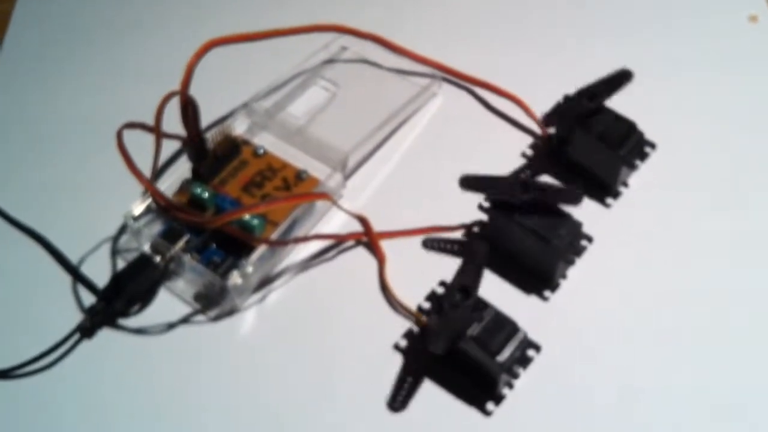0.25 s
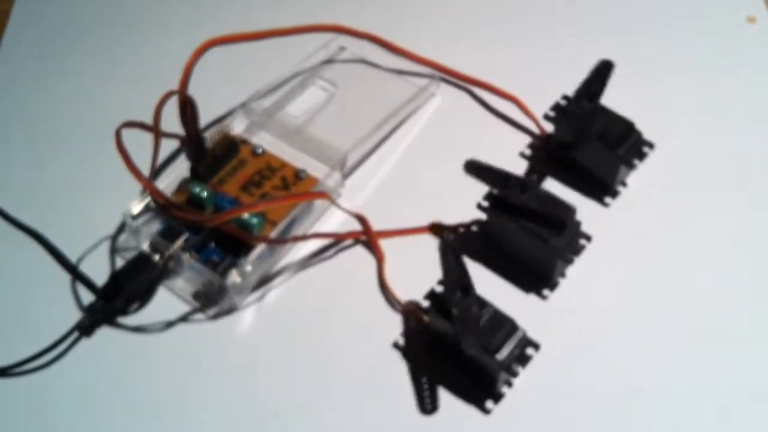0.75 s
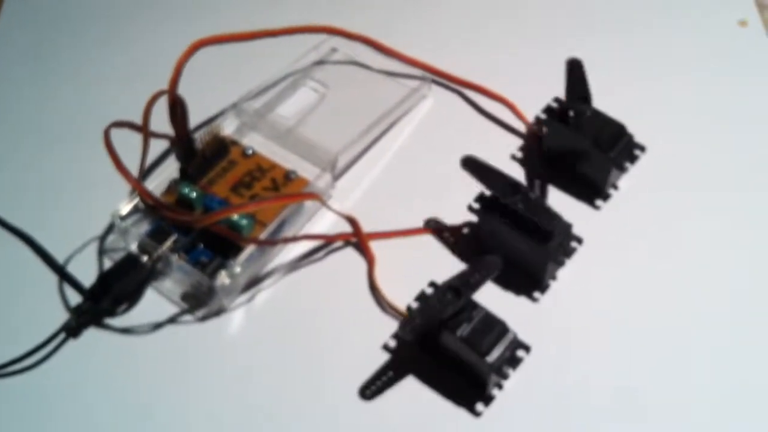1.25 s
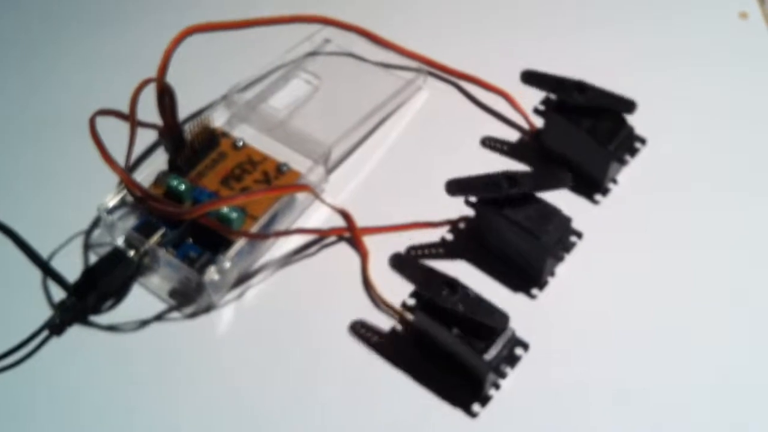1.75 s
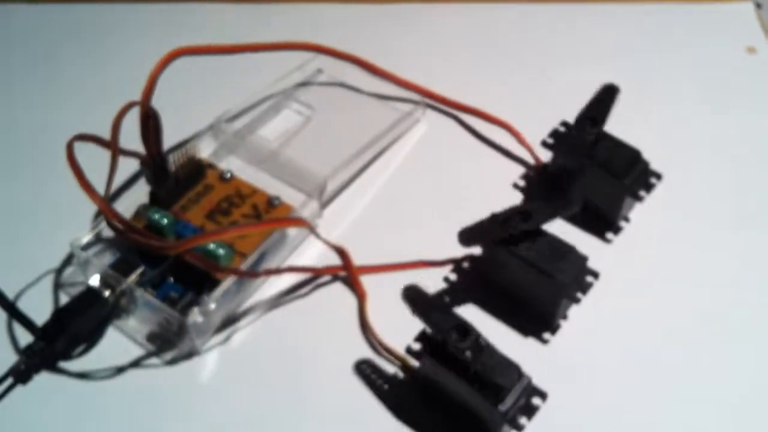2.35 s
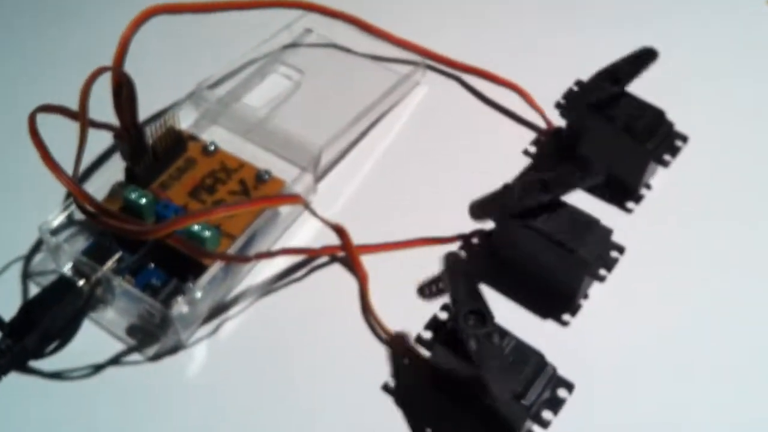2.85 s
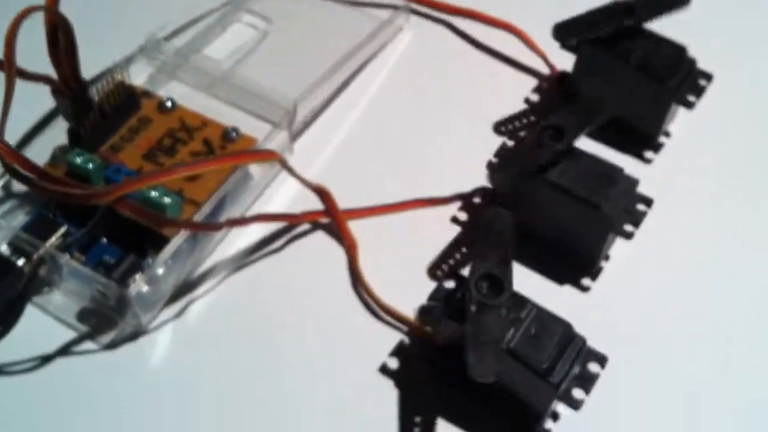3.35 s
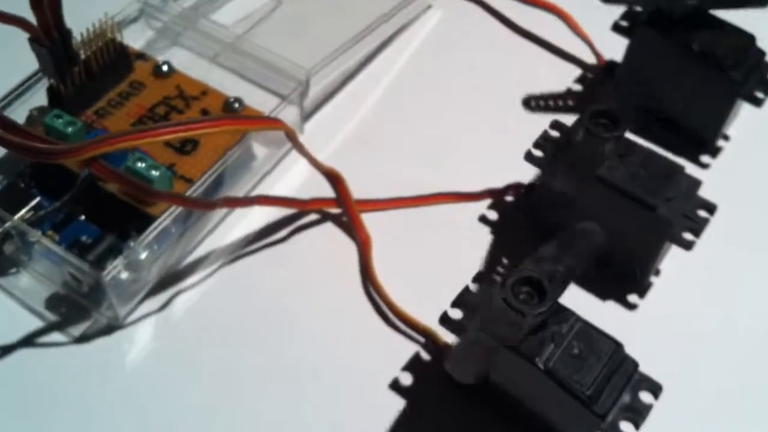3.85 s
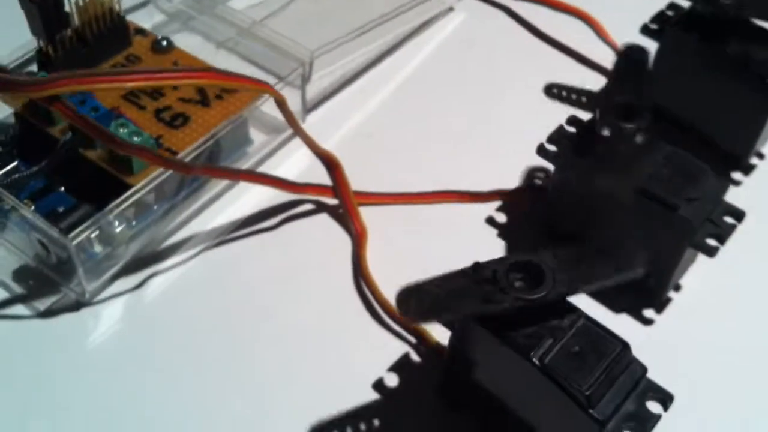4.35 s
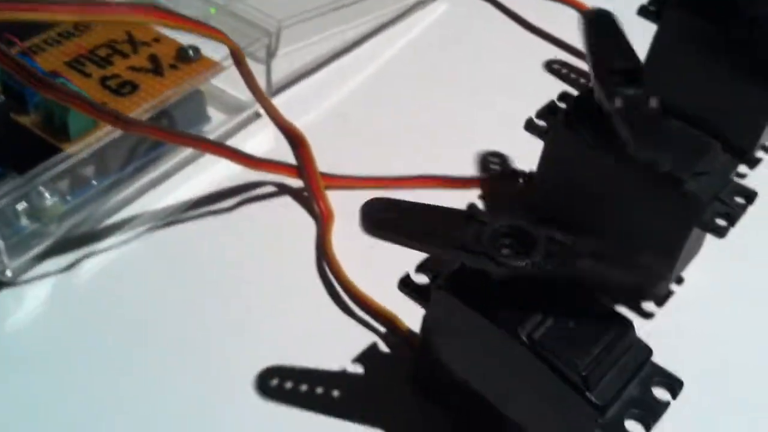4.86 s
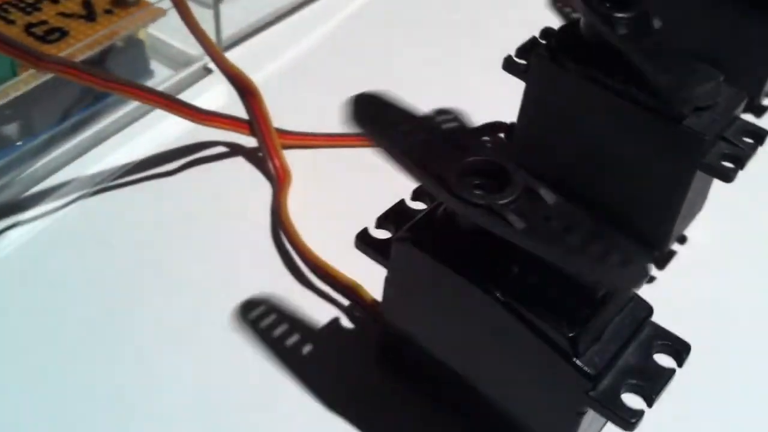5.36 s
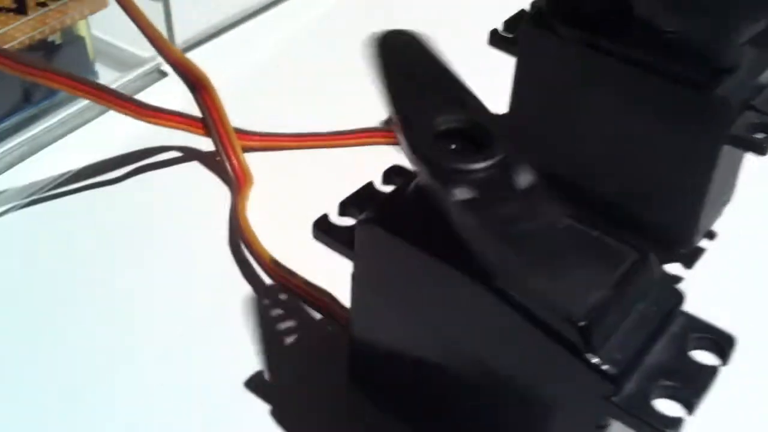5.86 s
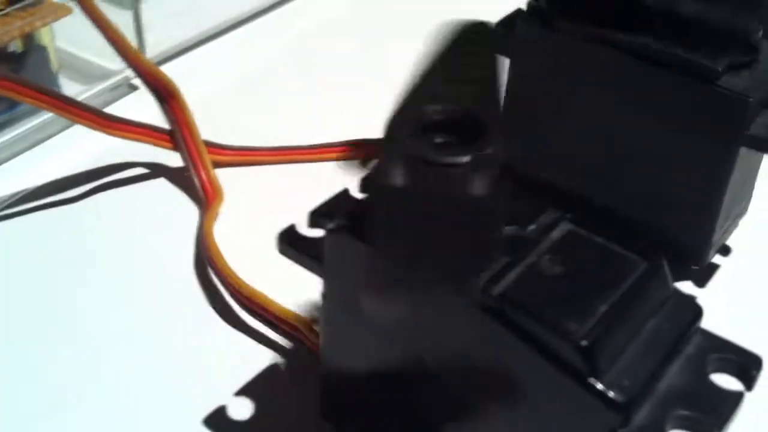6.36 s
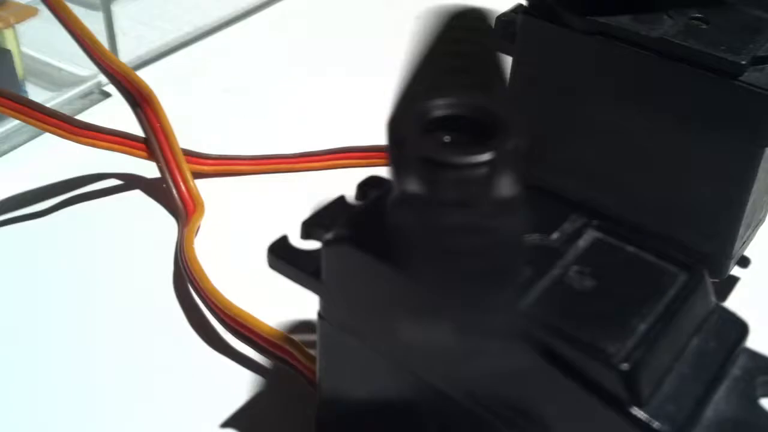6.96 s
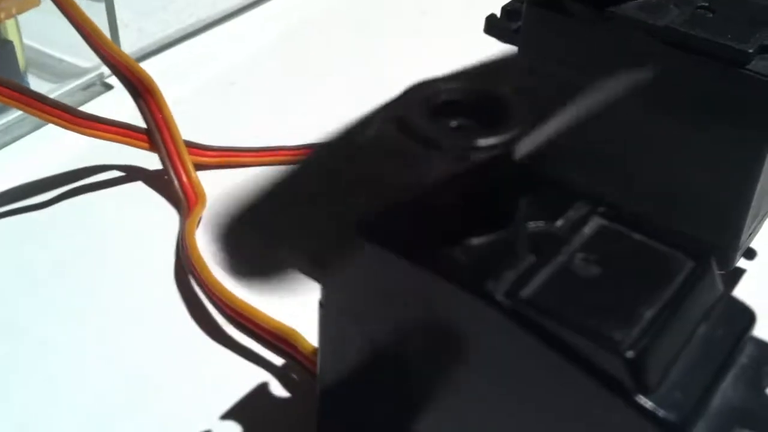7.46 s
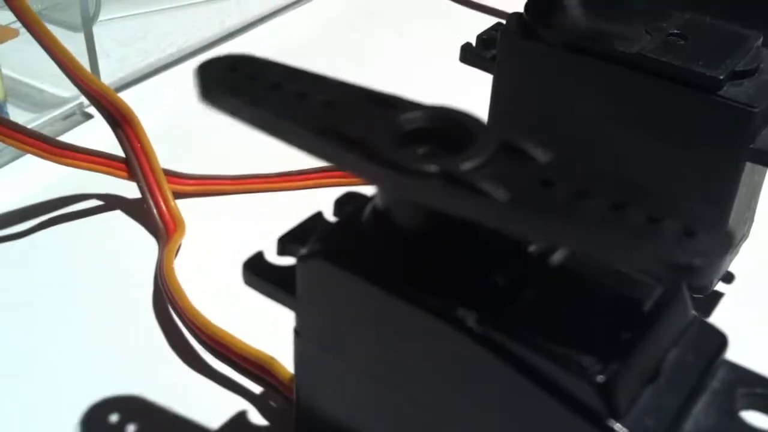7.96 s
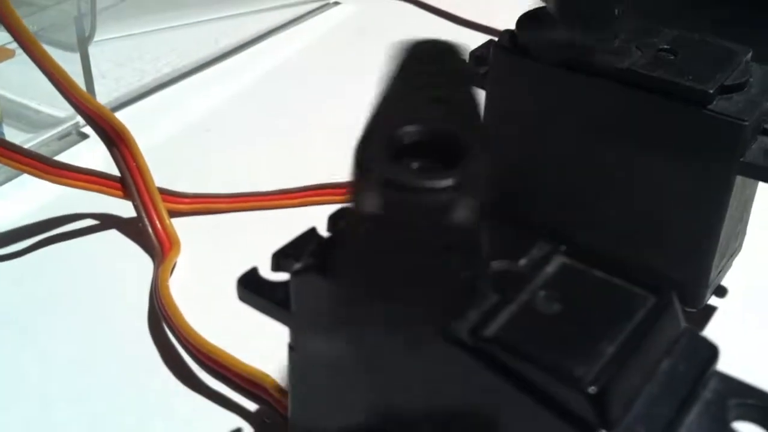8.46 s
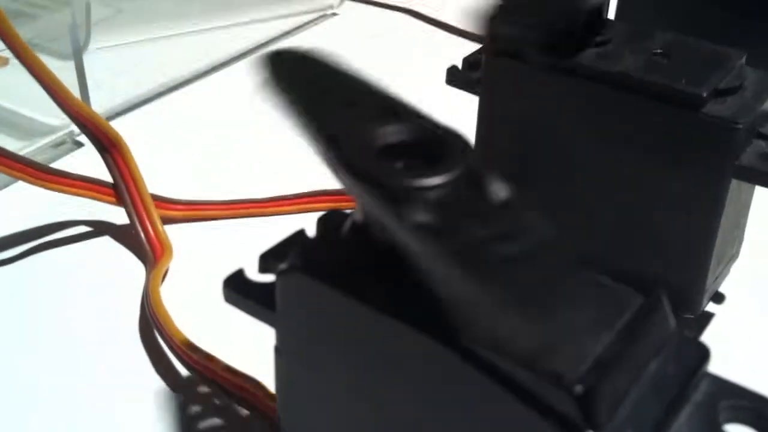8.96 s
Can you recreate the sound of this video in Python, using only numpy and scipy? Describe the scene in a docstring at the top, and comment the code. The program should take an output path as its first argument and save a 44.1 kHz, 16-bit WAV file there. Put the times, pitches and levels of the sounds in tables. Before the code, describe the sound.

Three small servo motors run continuously on a table in a quiet room. A high gear whine wavers over rasping teeth, a fizzy rattle in plastic cases and scattered sharp clicks. The whine sinks in pitch early on, then climbs back. Everything grows louder as the microphone moves in on the nearest servo, which slows unevenly once more and speeds up again near the end. A faint motor hum lies underneath.

```python
"""Three small servo motors on a table

Three hobby servos sweep their arms to and fro while the listener moves in on the nearest one.
Its pinion (the small gear on the motor) whines against a slightly off-centre gear, rising and falling
with the speed. Teeth rasp and rattle in the plastic cases, the motor brushes fizz, and loose gears click.
Behind that are the hum of the other two motors, a faint drone, two soft bumps and a quiet room.
A faint, very high hiss comes and goes."""
import sys
import numpy as np
from scipy import signal
from scipy.fft import rfft, irfft, next_fast_len
from scipy.io import wavfile
from scipy.ndimage import uniform_filter1d, map_coordinates

SR = 44100
rng = np.random.default_rng(int(sys.argv[2]) if len(sys.argv) > 2 else 0)


def wav_record(signal):
    """Record a signal, one row per channel, as 16-bit PCM in the file named by sys.argv[1]."""
    frames = np.transpose(np.atleast_2d(signal))
    bounded = np.clip(frames, -1, 1)
    # unit amplitude maps onto the largest positive 16-bit level
    quanta = np.round(bounded * 32767).astype(np.int16)
    wavfile.write(sys.argv[1], SR, quanta)


N = 406161

# Tone colour of the room's rumble: frequency_hz, gain_db
ROOM_COLOUR = [(15, -32), (45, -15), (65, -20), (95, -13), (130, -2), (240, 1), (320, -0.5), (450, -5.5),
               (1000, -10.5), (4000, -19.5)]
# A faint low hum that comes and goes: start_s, end_s, first_pitch_hz, last_pitch_hz, level_db
DRONE_NOTES = [(-.1, .9, 246, 248.4, -64), (0.803, 2.196, 264, 263.3, -68), (5.5, 6.702, 200.1, 199, -61.5),
               (6.8, 7.848, 184, 177.2, -65.5)]
# Tone colour of the dull thud: frequency_hz, gain_db
THUD_COLOUR = [(40, -28), (120, 9), (300, -9), (800, -14), (2000, -50)]
# Tone colour of a faint, very high hiss: frequency_hz, gain_db
TOP_HISS_COLOUR = [(9000, -70), (13000, -22), (14200, 1), (15000, -16), (16000, 6)]
# How that hiss comes and goes, compared with the level of the fizz: time_s, gain_db
TOP_HISS_GAIN = [(0, -5), (2, -15), (4.3, -9), (4.7, 7), (5.6, 9), (6.1, -4), (7.8, -38), (8.2, 9)]

# Speed of the second motor: time_s, turns_per_s
SECOND_SPEED = [(0, 235), (1.05, 231), (1.3, 238), (1.55, 214), (2.3, 196), (2.43, 222), (2.56, 242),
                (2.8, 247), (6.92, 245), (7.12, 226), (7.3, 178), (7.48, 190), (7.64, 217), (7.76, 180),
                (7.98, 162), (8.4, 171), (8.6, 200), (8.88, 234), (9.21, 236)]
# Speed of the third motor: time_s, turns_per_s
THIRD_SPEED = [(0, 240), (1.3, 228), (2.07, 200), (2.5, 230), (3.0, 223), (4.2, 236), (6.8, 236),
               (7.13, 224), (7.32, 238), (7.66, 213), (7.85, 167), (8.1, 240), (8.44, 221), (8.8, 237),
               (9.21, 234)]
# How strongly those two motors hum under their load: time_s, gain_db
HUM_GAIN = [(0, 0), (.5, -1.5), (1.4, -1), (2.48, 2.5), (3.1, -1), (4.5, 2.5), (6.8, -1.5), (7.5, -4),
            (8.3, 2.5), (8.8, 2), (9.21, 1)]
# Speed of the nearest servo: time_s, teeth_per_s
NEAR_SPEED = [(0, 2273), (.8, 2220), (1.0, 2109), (1.3, 2170), (1.6, 1520), (1.77, 1380), (2.15, 999),
              (2.68, 2004), (3.0, 2185), (4.2, 2240), (6.15, 2229), (6.55, 2156), (6.8, 2073), (6.97, 1882),
              (7.08, 1607), (7.25, 1300), (7.52, 1315), (7.6, 1860), (7.65, 1473), (7.76, 1200),
              (7.88, 1355), (8.05, 1945), (8.14, 2116), (8.42, 2027), (8.85, 2245), (9.21, 2250)]
# Loudness of the gears, from their load and closeness: time_s, gain_db
GEAR_GAIN = [(0, -7), (1.0, -7), (1.38, -8.5), (1.52, -8.5), (2.13, -10), (2.5, -3.5), (3.1, -4),
             (3.6, -1.5), (4.4, 0), (5.1, 2.5), (5.6, 1), (6.05, 4), (6.33, 6), (6.57, 5.5), (6.7, 1),
             (7.1, 3), (8.2, 3), (8.65, 5), (9.21, 5.5)]

# Tone colour of the grinding heard through the cases: frequency_hz, gain_db
GRIND_COLOUR = [(60, -68), (300, -18), (600, -28.5), (1000, -11), (1230, -9), (1420, -8), (1700, -3.5),
                (2000, -0.5), (2600, 6), (3150, 3), (3600, 1), (4600, -3), (6000, -13.5)]
# Tone colour of the rasping teeth: frequency_hz, gain_db
RASP_COLOUR = [(200, -80), (2000, -54), (3500, -5), (4500, -7), (4900, -1.5), (5500, 3.5), (6100, 5),
               (6700, 1.5), (7200, -4), (7700, -2.5), (8300, -11), (9500, -3.5), (14000, -41)]
# Tone colour of the brush fizz: frequency_hz, gain_db
FIZZ_COLOUR = [(300, -95), (4000, -31), (7000, -11.5), (8400, -9.5), (9100, -4.5), (9900, -3.5), (10900, 2),
               (11600, 3.5), (12300, 3.5), (13300, 1), (14000, -6), (14700, -31), (16000, -40)]
# Loudness of the fizz: time_s, level_db
FIZZ_LEVEL = [(0, -26.5), (.95, -28), (1.2, -29.5), (1.42, -27.5), (1.51, -31.5), (2.13, -32), (2.35, -26),
              (2.6, -24), (3.2, -25), (3.87, -21), (4.25, -25), (5.1, -24.5), (5.5, -25), (6.0, -22),
              (6.61, -22), (6.66, -26), (7.1, -24.5), (8.22, -26.5), (8.6, -20), (9.21, -20)]
# Brief flares and drops of the rattle: time_s, half_length_s, fizz_db, rasp_db, grind_db
FLARES = [(3.879, .06, -0.5, 0, 0), (5.444, 0.058, -1.5, -1.5, -0.5), (6.622, 0.013, 4.5, 1, -1),
          (7.076, 0.061, 1.5, 2.5, 0), (7.274, 0.016, -2, -2, -1), (7.349, 0.031, 1.5, 0.5, -2),
          (7.429, 0.015, -4, 1, -3), (7.573, 0.078, 0.5, 1.5, -0.5), (7.67, 0.014, 3, 0, -1),
          (8.19, 0.097, -2.5, -2, -4), (9.133, 0.027, 1.5, 0.5, 1)]
# The listener moves in on the nearest case: time_s, nearness (0 far, 1 near)
NEARNESS = [(0, 0.27), (1.45, 0), (2.2, 0.76), (2.7, 0.47), (5.0, 0.71), (6.6, 0.96), (9.21, 0.88)]
# Tone colour of the gear noise from afar: frequency_hz, gain_db
COLOUR_FROM_AFAR = [(1500, 2.5), (2200, -1), (2550, -4.5), (2780, -24), (3200, 0), (4200, 6), (4900, -3),
                    (6000, 1.5), (7300, 2), (8200, 3), (10300, -1), (12000, -4), (13300, -0.5)]
# The same from close by: frequency_hz, gain_db
COLOUR_UP_CLOSE = [(1500, 0.5), (2700, 0), (3600, -1.5), (4400, 2), (5900, -1.6), (7400, -1.5),
                   (8500, -0.5), (9700, 1), (11500, -1.5), (13200, 0.5), (14100, -7.5)]

# Narrow bands in which the plastic cases ring, low to high: pitch_hz, width_hz
RING_BANDS = [(3090, 395), (3240, 460), (3900, 290), (4850, 810), (5900, 900), (9300, 930), (10650, 410),
              (11000, 890), (12200, 1050)]
# One table for each band, in that order; each swells with load and closeness: time_s, level_db
FAR_HOLLOW_LEVEL = [(0, -47.5), (1.15, -48), (1.35, -54), (1.6, -43.5), (2.15, -45.5), (2.6, -51),
                    (3.25, -52), (3.5, -45), (3.7, -56), (4.3, -60), (7.6, -38.5), (9.21, -46.5)]
NEAR_HOLLOW_LEVEL = [(0, -52.5), (4.2, -64), (4.8, -41.5), (5.6, -42.5), (6.4, -35.5), (6.75, -42),
                     (7.7, -39), (8.02, -39), (8.14, -67), (8.3, -53), (8.55, -38), (9.21, -37.5)]
MIDDLE_RING_LEVEL = [(0, -58), (2.1, -55), (2.5, -46), (4.1, -47), (4.6, -54), (6.3, -42), (9.21, -58)]
UPPER_RING_LEVEL = [(0, -43.5), (1.4, -46.5), (2.8, -51), (4.8, -48), (6.2, -36), (7.2, -36), (8.0, -49),
                    (8.2, -35), (8.45, -44), (8.7, -32), (9.21, -31.5)]
BRIGHT_RING_LEVEL = [(0, -48), (2.0, -48), (2.7, -39.5), (4.4, -40), (6.3, -34.5), (6.75, -32.5),
                     (7.6, -31), (8.0, -34), (8.2, -46), (8.7, -33.5), (9.21, -33)]
THIN_RING_LEVEL = [(0, -41), (1.7, -54), (2.7, -39), (5.2, -34.5), (6.8, -70), (7.2, -35), (7.9, -38),
                   (8.15, -50), (9.21, -38)]
FAR_SIZZLE_LEVEL = [(0, -52), (2.1, -50), (2.65, -29), (3.2, -34.5), (3.9, -29.5), (4.5, -42), (6.0, -42),
                    (9.21, -33)]
NEAR_SIZZLE_LEVEL = [(0, -44), (2.0, -49), (3.5, -31), (5.3, -34), (6.3, -33), (6.7, -32), (7.08, -26.5),
                     (7.6, -29), (8.2, -43), (9.21, -37)]
TOP_SIZZLE_LEVEL = [(0, -45), (1.5, -50), (2.6, -37), (3.8, -30), (5.1, -29.5), (6.2, -54), (7.5, -41),
                    (8.2, -48), (8.7, -36), (9.21, -34)]
# A gear rubs and sets its case ringing: time_s, half_length_s, level_db
GEAR_RUBS = [(.61, .04, -43), (2.523, 0.077, -45), (2.971, 0.078, -44), (3.37, 0.098, -44),
             (3.626, 0.064, -46), (4.14, 0.081, -48), (7.07, 0.049, -38)]
# The gap between loose teeth snaps shut: time_s, strength_db
GEAR_SNAPS = [(0.0872, -13), (0.756, -15), (0.8639, -17), (1.4246, -15), (1.9325, -19), (1.979, -18),
              (2.173, -10.5), (2.2498, -15), (2.6115, -10), (3.6775, -9), (3.754, -10), (3.8609, -5),
              (4.1417, -2.5), (4.206, -7), (5.5857, -6), (5.7286, -9), (6.6245, -4), (7.6828, -6),
              (8.5749, -9), (9.1665, -5)]

# How the case passes the whine at each speed: teeth_per_s, first_harmonic_db, third_harmonic_db
WHINE_BY_SPEED = [(1150.4, -78, -56), (1430, -57.5, -52), (1649.4, -52.5, -31), (1900, -45, -33.5),
                  (2100, -40, -32), (2120, -40, -32.5), (2240, -39.5, -39.5), (2290, -37, -41)]
# How far the whine's lowest tone stands out of the gear noise: time_s, gain_db
FIRST_HARMONIC_GAIN = [(0, -5), (.22, -8), (.36, -2), (.7, -0.5), (.95, 3), (1.3, 3), (1.7, 9), (2.35, -3),
                       (2.7, -2.5), (4.9, 0), (6.6, -1.5), (6.75, -4.5), (7.05, -1), (7.25, -20), (7.6, 4),
                       (7.75, -4), (7.87, -2), (7.97, 2), (8.15, 2), (9.21, -0.5)]
# How far its third harmonic (three times the pitch) stands out: time_s, gain_db
THIRD_HARMONIC_GAIN = [(0, 4), (.65, 4), (1.0, 2.5), (1.35, 2), (1.55, 0), (2.5, -1), (2.75, 0), (3.0, -4),
                       (3.6, 4), (4.6, 1), (4.95, -4.5), (5.9, 1.5), (6.35, 3), (6.62, -2.5), (6.75, -5),
                       (7.25, -12), (7.6, 3), (8.03, -6), (8.09, 2.5), (8.45, -0.5), (8.7, -5), (9.21, 2)]
# Two more harmonics, heard mostly at full speed: time_s, second_harmonic_db, fifth_harmonic_db
EDGE_LEVELS = [(0, -50, -36), (.65, -46, -41), (.9, -53, -40), (1.5, -79, -65), (3.0, -60, -50),
               (4.6, -54, -38), (5.8, -44, -38), (6.7, -61, -57), (8.5, -56, -58), (9.21, -54, -49)]

PINION_TEETH, GEAR_TEETH = 10, 50
FULL_TEETH_PER_S, FULL_TURNS_PER_S = 2190, 284  # running freely: the nearest servo, the other motors
TOP_HZ = 15900


def amp(db):
    """Turn decibels into a number to multiply by."""
    return 10 ** (np.asarray(db) / 20)


def unit(x):
    """Scale x to an average strength (rms) of 1."""
    return x / np.sqrt(np.mean(x ** 2) + 1e-20)


def curves(rows):
    """Join a table's points with lines: one value per sample for each column after the time."""
    times, *columns = np.transpose(rows)
    return [np.interp(np.arange(N) / SR, times, column) for column in columns]


def wobble(rate):
    """A smooth random curve that heads for a new value rate times a second."""
    points = rng.standard_normal(int(N * rate / SR) + 4)
    steps = np.arange(0, len(points) - 1, 1 / 10)
    return np.interp(np.arange(N) * rate / SR, steps, map_coordinates(points, [steps]))


def swell(time_s, half_length_s):
    """A bell-shaped rise and fall that reaches 1 at time_s."""
    return np.exp(-((np.arange(N) / SR - time_s) / half_length_s) ** 2)


def filtered(x, response):
    """Multiply each frequency in x by response(hz)."""
    size = next_fast_len(N + 8192)
    return irfft(rfft(x, size) * response(np.fft.rfftfreq(size, 1 / SR)), size)[:N]


def shaped(x, colour):
    """Give x the tone colour in a table."""
    points_hz, gain_db = np.transpose(colour)
    return filtered(x, lambda hz: amp(np.interp(np.log(hz + 1), np.log(points_hz), gain_db)))


def coloured(x, colour):
    """Give x a tone colour and a strength of 1."""
    return unit(shaped(x, colour))


def resonance(x, hz, width_hz):
    """Let x ring in one band around hz, at a strength of 1."""
    return unit(filtered(x, lambda f: (1j * f * width_hz / (hz * hz - f * f + 1j * f * width_hz)) ** 2))


def angle(rate):
    """The angle, in radians, of a shaft that turns rate times a second."""
    return 2 * np.pi * np.cumsum(rate) / SR


def impacts(phase, scatter_db):
    """One tiny blow of random size and sign in each cycle."""
    at = np.flatnonzero(np.diff(np.floor(phase / (2 * np.pi))) > 0)
    signs, sizes = rng.standard_normal((len(at), 2)).T
    blows = np.zeros(N)
    blows[at] = np.sign(signs) * amp(scatter_db * np.clip(sizes, -2, 2))
    return unit(blows)


def closeness(far, close):
    """Slide from far to close as the gears get louder and the nearest servo stands out."""
    return np.interp(curves(GEAR_GAIN)[0], [-7, 0.5], [far, close])


def slowness():
    """About 0 when the nearest servo runs freely, 1 if it stands still."""
    return 1 - curves(NEAR_SPEED)[0] / FULL_TEETH_PER_S


def room():
    """The low rumble of a quiet room."""
    return amp(-59.5 + 0.4 * wobble(14)) * coloured(rng.standard_normal(N), ROOM_COLOUR)


def drone():
    """A faint, wavering low hum fades in, drifts in pitch and fades out."""
    t = np.arange(N) / SR
    fade_s = 0.075
    notes = np.zeros(N)
    for start, end, first_hz, last_hz, db in DRONE_NOTES:
        fade = np.clip(np.minimum(t - start, end - t) / fade_s, 0, 1)
        pitch_hz = np.interp(t, [start, end], [first_hz, last_hz])
        notes += amp(db) * fade * np.sin(angle(pitch_hz) + 0.29 * wobble(30))
    return notes * amp(1.9 * wobble(14))


def bumps():
    """A soft, low thud, and later a dull knock from one short push on the table."""
    thud = swell(time_s=3.86, half_length_s=0.024) * coloured(rng.standard_normal(N), THUD_COLOUR)
    knock_s, push_s = 8.839, 0.00094
    age = np.maximum(np.arange(N) / SR - knock_s, 0) / push_s
    knock = (age > 0) * (1 - 2 * age + age * age / 2) * np.exp(-age)
    return amp(-55.5) * thud + amp(-31) * knock


def top_hiss(noise):
    """A faint, very high hiss that comes and goes."""
    return amp(curves(TOP_HISS_GAIN)[0]) * coloured(noise, TOP_HISS_COLOUR)


def rotor(shaft, speed):
    """A motor's three-pole core hums at three times its speed; as it slows, the hum fades and falters."""
    slow = np.clip(1 - curves(speed)[0] / FULL_TURNS_PER_S, 0, 1)
    jitter = (0.22 + 2 * slow) * wobble(35)
    tone = np.sin(3 * shaft + jitter) + amp(-9) * np.sin(2 * shaft) + amp(-7) * np.sin(shaft)
    level_db = 0.67 * curves(GEAR_GAIN)[0] + curves(HUM_GAIN)[0] - 14 * slow
    waver_db = (1.6 + 14 * slow) * np.tanh(wobble(14))
    return amp(level_db + waver_db) * tone


def motor_hum(second, third):
    """The other two motors hum; the second booms or rings where it meets a resonance of its case."""
    boom_hz, boom_width_hz = 710, 13
    boom_db = np.exp(-((3 * curves(SECOND_SPEED)[0] - boom_hz) / boom_width_hz) ** 2)
    ring = resonance(np.sin(5 * second + 0.96 * wobble(70)), hz=1233, width_hz=160)
    hum = amp(-64.3 + boom_db) * rotor(second, SECOND_SPEED) + amp(-69) * rotor(third, THIRD_SPEED)
    return hum + amp(-67 + 2 * wobble(9)) * ring


def chatter(shaft, scatter_db, decay_s):
    """Once a turn the teeth knock together, and the chatter dies within milliseconds."""
    t = np.arange(SR // 50) / SR
    knocks = np.abs(impacts(shaft + 0.5 * wobble(120), scatter_db))
    return unit(signal.fftconvolve(knocks, np.exp(-t / decay_s))[:N])


def evened(x):
    """Hold the strength of x near 1 over each tenth of a second."""
    return x / np.sqrt(uniform_filter1d(x ** 2, SR // 10))


def tooth_contact(gear, second, third):
    """How hard the teeth press: slack makes them sway and knock, most at low speed; loose ones tick."""
    slack_db = closeness(far=1.5, close=3.5) + 3.5 * slowness()
    sway = 0.44 * np.cos(2 * gear + 0.5 * wobble(40)) + 0.25 * np.cos(gear + 0.5 * wobble(25))
    knocks = chatter(third, scatter_db=7.5, decay_s=0.00071)
    knocks += 0.27 * chatter(second, scatter_db=8, decay_s=0.00088)
    contact = amp(slack_db * (sway + 0.25 * wobble(200)) + 0.46 * wobble(40))
    contact *= 0.5 + 0.13 * slack_db * knocks
    ticks_per_s = 35 * amp(5 * wobble(30))
    ticks = chatter(angle(ticks_per_s), scatter_db=5, decay_s=0.00091)
    softened = np.tanh(evened(contact) / 1.4)  # rounds off the hardest knocks
    return evened(softened * (1 + 0.061 * ticks))


def tooth_blows(shafts):
    """Every tooth of each motor's pinion lands with a tiny blow."""
    return unit(sum(impacts(PINION_TEETH * shaft, scatter_db=5.5) for shaft in shafts))


def case_rings(blows):
    """Tooth blows make the plastic cases ring in narrow bands."""
    levels = (FAR_HOLLOW_LEVEL, NEAR_HOLLOW_LEVEL, MIDDLE_RING_LEVEL, UPPER_RING_LEVEL,
              BRIGHT_RING_LEVEL, THIN_RING_LEVEL, FAR_SIZZLE_LEVEL, NEAR_SIZZLE_LEVEL, TOP_SIZZLE_LEVEL)
    return sum(amp(curves(level)[0] + 1.4 * wobble(8.8)) * resonance(blows, hz, width_hz)
               for (hz, width_hz), level in zip(RING_BANDS, levels))


def scrapes(blows):
    """Short surges of rubbing teeth make a case ring in one band."""
    surges = sum(amp(db) * swell(time_s, half_s) for time_s, half_s, db in GEAR_RUBS)
    return surges * resonance(blows, hz=3910, width_hz=210)


def brushes(shafts):
    """The brushes that feed each motor slide along and spark as they break contact six times a turn."""
    sparks = unit(sum(impacts(6 * shaft, scatter_db=5) for shaft in shafts))
    return 0.55 * sparks + rng.standard_normal(N)


def load_flutter():
    """The load flutters and flares as the arms turn: decibel curves for fizz, rasp and grinding."""
    flares_db = sum(np.outer(dbs, swell(time_s, half_s)) for time_s, half_s, *dbs in FLARES)
    return 0.53 * wobble(14) + flares_db


def listening_position(x):
    """The tone colour changes as the listener moves in; the turning arms shift the treble in patches."""
    near = np.clip(curves(NEARNESS)[0], 0, 1)
    blend = (1 - near) * shaped(x, COLOUR_FROM_AFAR) + near * shaped(x, COLOUR_UP_CLOSE)
    hz, _, spectrum = signal.stft(blend, SR, nperseg=512)
    patches = uniform_filter1d(rng.standard_normal(spectrum.shape), size=4, axis=0)  # smooth in pitch
    patches = uniform_filter1d(patches, size=50, axis=1)  # and in time
    depth_db = 2.2 * np.minimum(hz / 4900, 1)[:, None]  # the arms block low sounds less
    return signal.istft(spectrum * amp(depth_db * unit(patches)), nperseg=512)[1][:N]


def gear_noise(gear, second, third):
    """Teeth strike and slide, grinding and rasping through the cases while the brushes fizz above."""
    gears_db = curves(GEAR_GAIN)[0]
    shafts = gear * GEAR_TEETH / PINION_TEETH, second, third
    contact = tooth_contact(gear, second, third)
    strike_and_slide = lambda: tooth_blows(shafts) + rng.standard_normal(N)
    grind = coloured(strike_and_slide() * contact ** 0.37, GRIND_COLOUR)
    rasp = coloured(strike_and_slide() * contact ** 0.5, RASP_COLOUR)
    rings = case_rings(tooth_blows(shafts) * contact)
    rubbing = scrapes(tooth_blows(shafts) * contact)
    crackle = brushes(shafts) * contact
    fizz_and_hiss = coloured(crackle, FIZZ_COLOUR) + top_hiss(crackle)
    fizz_flutter_db, rasp_flutter_db, grind_flutter_db = load_flutter()
    grind *= amp(-38.5 + 0.83 * gears_db + grind_flutter_db)
    rasp *= amp(-30.5 + 1.11 * gears_db + rasp_flutter_db)
    fizz_and_hiss *= amp(curves(FIZZ_LEVEL)[0] + fizz_flutter_db)
    rings *= amp((fizz_flutter_db + rasp_flutter_db) / 2)
    return listening_position(grind + rasp + fizz_and_hiss) + rings + rubbing


def clicks():
    """Loose teeth cross the gap between them and land with a short, bright snap."""
    t = np.arange(SR // 50) / SR
    noise = coloured(rng.standard_normal(N), FIZZ_COLOUR)
    noise += 0.14 * coloured(rng.standard_normal(N), RASP_COLOUR)
    rise_s, fade_s = 0.00068, 0.0072
    shape = amp(-60 * t / fade_s) * (1 - np.exp(-t / rise_s))
    snaps = np.zeros(N)
    for time_s, db in GEAR_SNAPS:
        at = round(time_s * SR)
        snap = shape * noise[at:at + len(t)]
        snaps[at:at + len(t)] += amp(db - 1.5) * snap / np.abs(snap).max()
    return snaps


def tooth_tone(gear, harmonic, swing, pulse_db, rough):
    """One harmonic of the meeting teeth; the off-centre gear bends and swells it once a turn."""
    off_centre = closeness(far=0.78, close=0.9)
    smear = 1 + 11 * np.clip(slowness() - 0.07, 0, 0.16)  # slower teeth lose contact and chatter
    sway = np.sin(gear) + 0.27 * np.sin(2 * gear)  # a slightly oval gear adds two bends a turn
    bend = off_centre * (swing * sway + rough * smear * wobble(300))
    pulse = amp(off_centre * pulse_db * (np.cos(gear + 1.23) + 0.39 * wobble(130)))
    return unit(pulse * np.sin(harmonic * GEAR_TEETH * gear + bend))


def whine(gear):
    """The nearest pinion sings on its gear; the case favours the third harmonic just under full speed."""
    gears_db = curves(GEAR_GAIN)[0]
    speeds, *gains = np.transpose(WHINE_BY_SPEED)
    first_db, third_db = [np.interp(curves(NEAR_SPEED)[0], speeds, gain) for gain in gains]
    first_db += gears_db + curves(FIRST_HARMONIC_GAIN)[0]
    third_db += 1.33 * gears_db + curves(THIRD_HARMONIC_GAIN)[0]
    second_db, fifth_db = curves(EDGE_LEVELS)
    first = tooth_tone(gear, harmonic=1, swing=1.01, pulse_db=5, rough=0.4)
    second = tooth_tone(gear, harmonic=2, swing=1, pulse_db=4, rough=0.46)
    roughness = closeness(far=1, close=0.77)  # a buzz from afar, a whistle close by
    third = tooth_tone(gear, harmonic=3, swing=2.34, pulse_db=3.5, rough=roughness)
    third = resonance(third, hz=6360, width_hz=2300)
    fifth = tooth_tone(gear, harmonic=5, swing=4, pulse_db=7, rough=0.63)
    return amp(first_db) * first + amp(second_db) * second + amp(third_db) * third + amp(fifth_db) * fifth


def scene():
    """Three servos in a quiet room, driven by the angles of the nearest gear and the other two motors."""
    gear = angle(curves(NEAR_SPEED)[0] / GEAR_TEETH * (1 + 0.001 * wobble(8)))
    second = angle(curves(SECOND_SPEED)[0] * (1 + 0.002 * wobble(6)))
    third = angle(curves(THIRD_SPEED)[0] * (1 + 0.005 * wobble(6)))
    rumble = room()
    servos = whine(gear) + motor_hum(second, third) + gear_noise(gear, second, third) + clicks()
    return (rumble + bumps() + drone() + servos)[None]


def record(dry):
    """Cut away all sound above TOP_HZ."""
    return filtered(dry[0], lambda hz: hz < TOP_HZ)[None]


dry = scene()
out = record(dry)
wav_record(out)
```